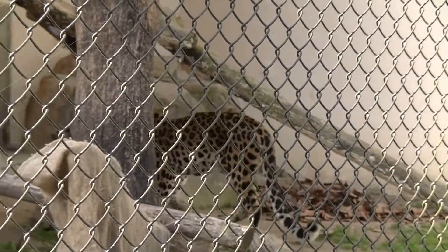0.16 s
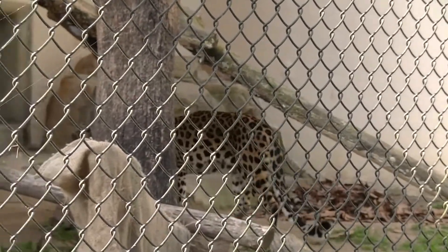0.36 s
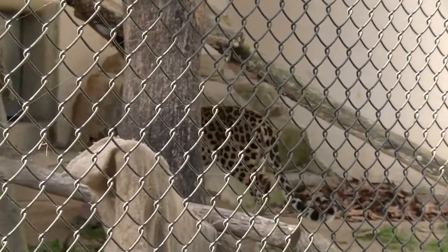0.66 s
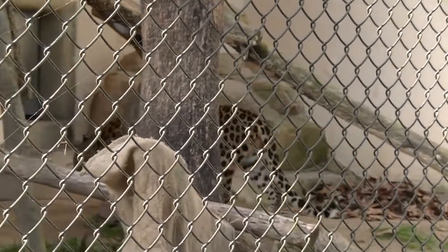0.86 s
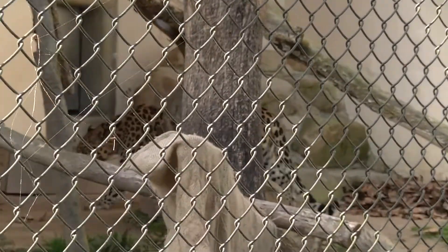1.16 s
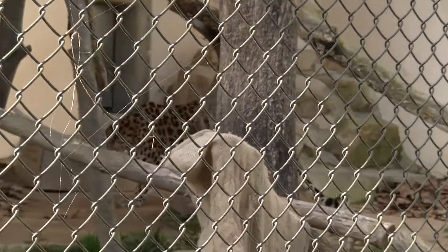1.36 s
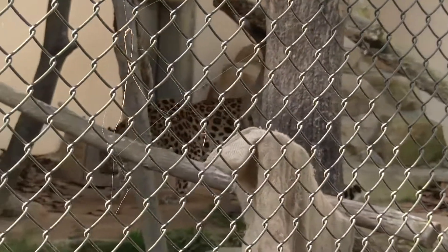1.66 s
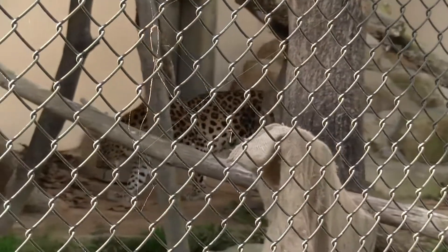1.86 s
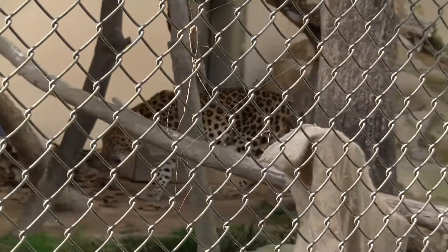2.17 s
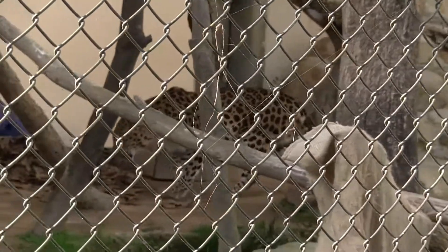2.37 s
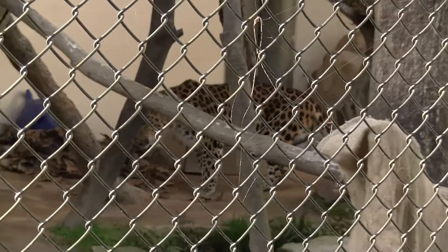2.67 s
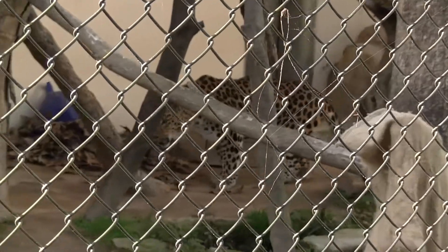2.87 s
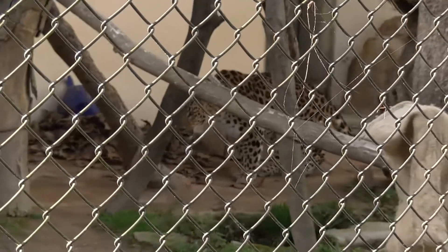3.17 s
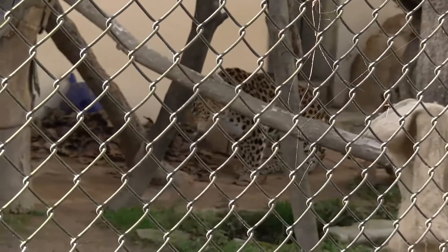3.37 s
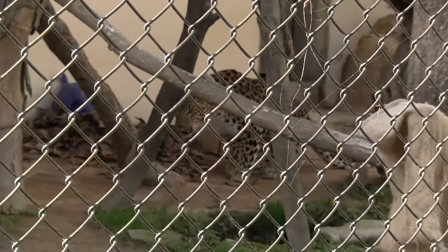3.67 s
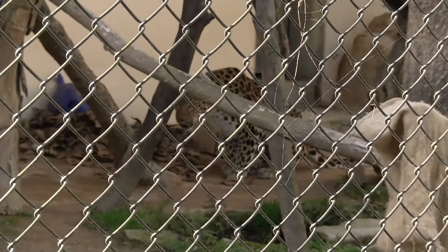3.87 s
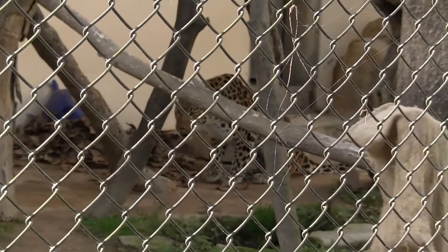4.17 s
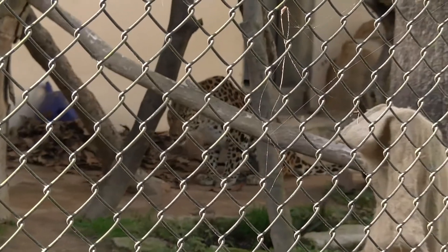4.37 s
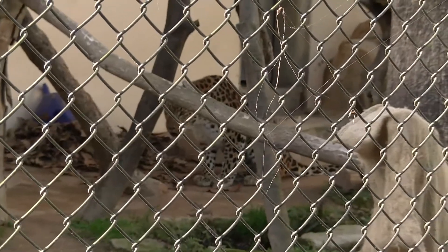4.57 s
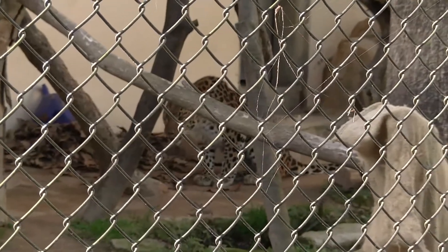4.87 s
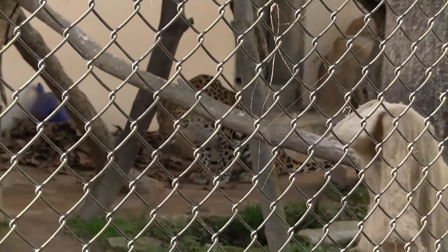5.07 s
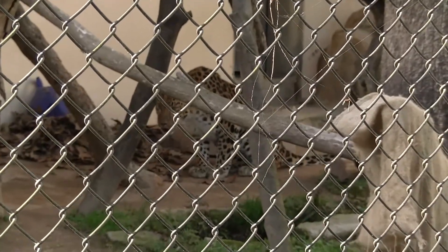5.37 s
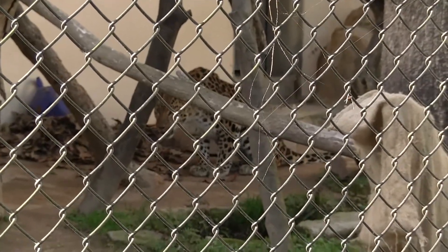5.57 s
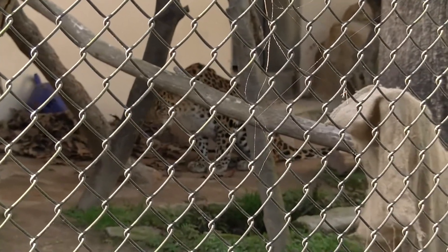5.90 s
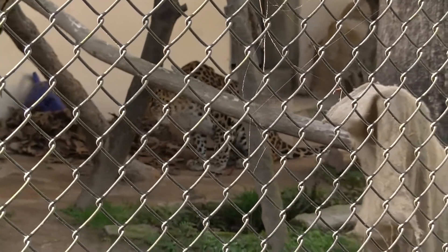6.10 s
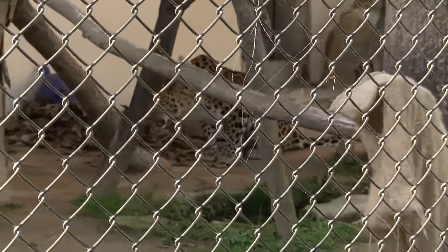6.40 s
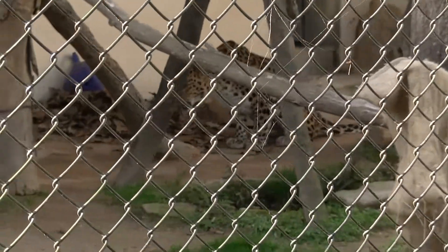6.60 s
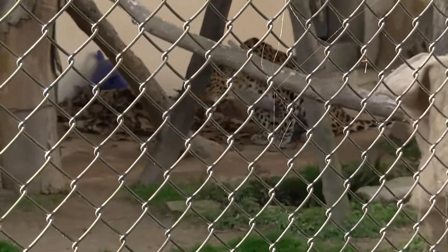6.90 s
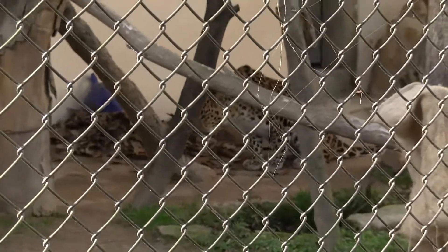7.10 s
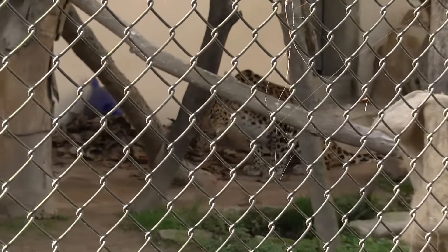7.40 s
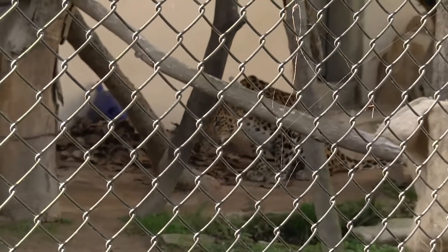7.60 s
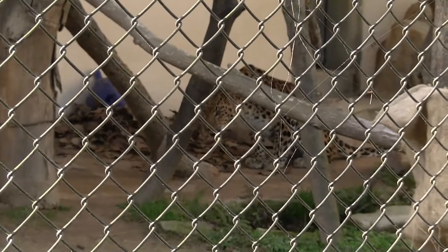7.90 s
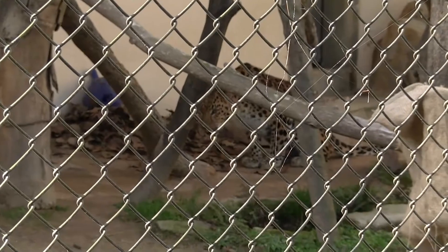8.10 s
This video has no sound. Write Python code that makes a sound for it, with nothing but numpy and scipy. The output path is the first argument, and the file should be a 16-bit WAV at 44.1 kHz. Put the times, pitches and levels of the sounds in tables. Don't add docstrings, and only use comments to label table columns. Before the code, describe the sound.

Deep, rough sawing calls from a leopard-like cat, a softer rasp in and a harder grunt out, repeating steadily over a distant low hum.

```python
import sys
import numpy as np
from scipy import signal
from scipy.fft import rfft, irfft, next_fast_len
from scipy.io import wavfile
from scipy.ndimage import uniform_filter1d

SR = 44100
rng = np.random.default_rng(int(sys.argv[2]) if len(sys.argv) > 2 else 0)


def linear_from_db(decibels):
    return 10 ** (np.asarray(decibels, float) / 20)


def persist_wave(psi):
    counts = np.round(np.clip(psi, -1, 1) * 32767).astype(np.int16)
    wavfile.write(sys.argv[1], SR, np.atleast_2d(counts).T)


N = 363825


def evened(x):
    return x / np.sqrt(np.mean(x ** 2) + 1e-20)


def read(points, hz):
    f, value = np.transpose(points)
    return np.interp(np.log(hz + 1), np.log(f + 1), value)


def add(mix, start_s, sound):
    part = mix[round(start_s * SR):][:len(sound)]
    part += sound[:len(part)]


def coloured(x, points, scale=1):
    size = next_fast_len(x.shape[-1] + 2048)
    hz = np.fft.rfftfreq(size, 1 / SR)
    return irfft(rfft(x, size) * linear_from_db(scale * read(points, hz)), size)[..., :x.shape[-1]]


def wander(count, per_s):
    knots = rng.standard_normal(int(count / SR * per_s) + 3)
    return np.interp(np.arange(count) / SR * per_s, np.arange(len(knots)), knots)


# f/Hz, level/dB per Hz
AIR_TONE = [(20, -40), (50, -6), (125, -6.5), (250, -12), (340, -19.5), (800, -22), (4000, -38),
            (15500, -50.5)]
# f/Hz, likeness/0-1
AIR_LIKENESS = [(60, 1), (240, 0.24), (950, 0.043), (3770, 0.03), (15000, 0.085)]


def air():
    frames, hz = N // 512 + 5, np.fft.rfftfreq(2048, 1 / SR)
    a, b, c, d, patches = rng.standard_normal((frames, 1025, 5)).T
    patches = uniform_filter1d(patches, size=16, axis=0)
    patches = evened(uniform_filter1d(patches, size=8, axis=1))
    same = np.clip(read(AIR_LIKENESS, hz), -1, 1)[:, None]
    left = a + 1j * b
    right = same * left + np.sqrt(1 - same ** 2) * (c + 1j * d)
    z = np.array([left, right]) * linear_from_db(read(AIR_TONE, hz)[:, None] + 1.5 * patches)
    wash = signal.istft(z, nperseg=2048, noverlap=1536)[1][:, :N]
    return linear_from_db(-43) * evened(wash)


# f/Hz, level/dB rms
MACHINE_LINES = [(59.5, -41.5), (122, -49)]


def hum():
    total = np.zeros(N)
    for hz, db in MACHINE_LINES:
        level = linear_from_db(db + 2.5 * wander(N, 6.))
        turns = np.cumsum(hz * (1 + .018 * wander(N, 8.))) / SR
        total += level * np.sin(2 * np.pi * turns)
    return np.sqrt(2) * total


def course(t, length, effort_db, top_hz, open_db, layers, swell, swell_db, fade, fade_db, sag_db,
           bend, slack, sink, gape_at=0, rest_hz=0, gape_hz=0):
    u = t / length
    rising = swell_db * np.clip(1 - u / swell, 0, 1) ** 1.27
    falling = sag_db * u + fade_db * np.clip(1 - (1 - u) / fade, 0, 1) ** bend
    slackening = np.clip(slack, 0, 6e-3) * (rising + np.maximum(falling, -20))
    low_hz = top_hz * (1 + slackening - sink * (u - .3))
    tension = 10 * (top_hz / 210 - 1)
    higher = [db + by_open * open_db + by_swell * rising + by_fade * falling + by_tension * tension
              for db, by_open, by_swell, by_fade, by_tension in layers]
    jaw = []
    if gape_hz:
        gape = np.exp(-((u - gape_at) / np.where(u < gape_at, .14, .22)) ** 2)
        jaw = [rest_hz + (gape_hz - rest_hz) * gape]
    return effort_db + rising + falling, low_hz, *higher, *jaw


def slapping_folds(count, slaps_per_s, jitter, spread_db, gate):
    turns = np.cumsum(slaps_per_s * np.exp(jitter * wander(count, 40.))) / SR + rng.random()
    cycle = turns.astype(int)
    size = linear_from_db(spread_db * np.clip(rng.standard_normal(cycle[-1] + 1), -2, 1.6))[cycle]
    slaps = evened(np.diff(cycle, prepend=cycle[0]) * size)
    burst = evened(gate + size * np.exp(-(turns % 1) / 0.31))
    return signal.lfilter(*signal.butter(2, 1000.0 / (SR / 2)), slaps), burst


# t/s, peak level/dB
FOLD_CATCHES = [(1.295, -30), (1.497, -15), (2.051, -28), (2.181, -21.5), (2.673, -12), (2.82, -16),
                (2.881, -8), (3.296, -15), (3.462, -15), (3.9, -24), (3.99, -14), (4.135, -18),
                (4.245, -10), (4.306, 7), (4.568, -23), (4.83, -19), (4.906, -7), (4.95, -9), (5.26, -24),
                (5.521, -29), (5.637, -7), (5.98, -26), (6.028, -15), (6.236, -21), (6.677, -25),
                (6.75, -16), (6.93, -17), (6.983, -8), (7.65, -25)]


def catches(t, start_s, effort_db, mouth_db):
    caught = np.zeros(len(t))
    for at, db in FOLD_CATCHES:
        strength = linear_from_db(np.clip(db + 11.0 - effort_db - mouth_db, -20, 8)) * (t >= at) * (at >= start_s)
        caught += strength * np.exp(-abs(t - at) / 0.018)
    return caught


def resonate(x, hz, width):
    turn = np.exp(2j * np.pi * np.cumsum(hz * np.ones(len(x))) / SR)
    r = np.exp(-np.pi * width / SR)
    return 2 * (turn * signal.lfilter([1 - r], [1, -r], x / turn + 1e-18)).real


def steadied(x, firmness):
    swing = np.sqrt(uniform_filter1d(x ** 2, size=1500) + 0.0071 * np.mean(x ** 2))
    return evened(x / swing ** np.clip(firmness, 0, 1))


def low_throat(drive, throb, swing_turns, low_hz, sung, chest, cut_hz):
    rung = drive
    for width in (84.0, 83.0, 102.0):
        rung = resonate(rung, low_hz, width)
    swing = evened(throb * np.cos(2 * np.pi * swing_turns))
    low = np.sqrt(1 - sung) * evened(rung) + np.sqrt(sung) * swing
    for hz, width, db in chest:
        low += linear_from_db(db) * evened(resonate(resonate(drive, hz, width), hz, 2 * width))
    band = signal.butter(4, [cut_hz / (SR / 2), 281.4 / (SR / 2)], "band", output="sos")
    return signal.sosfilt(band, low)


def throat(drive, modes, stretch):
    out = 0
    for k, (hz, width, db) in enumerate(modes):
        moved_hz = hz * (stretch if k == 1 else stretch ** 0.083 + 0.03 * wander(len(drive), 10.1))
        ring = resonate(resonate(drive, moved_hz, 0.83 * width), moved_hz, 2.6 * width)
        out = out + (-1) ** k * linear_from_db(db) * ring
    return evened(out)


def teeth_jet(puffs, hiss, push_db):
    count = len(puffs)
    teeth_hz = 6800 + 500 * wander(count, 5.2)
    whistles = sum(linear_from_db(8 * wander(count, 30.)) * resonate(puffs, k * teeth_hz, 700.0) for k in (1, 1.4))
    jet = steadied(coloured(puffs + 0.96 * whistles, hiss), 1.0)
    dull = signal.lfilter(*signal.butter(2, 9500.0 / (SR / 2)), jet)
    bright = np.clip((push_db + 62.0) / 23.0, 0, 1)
    return dull + bright * (jet - dull)


def breath(row, shape, layers, sung, chest, mouth, upper, hiss,
           slaps_per_s, jitter, spread_db, rough, gate, rise_s, cut_hz):
    start_s, end_s = row[0], row[0] + row[1]
    t = np.arange(start_s, end_s, 1 / SR)
    count = len(t)
    effort_db, low_hz, mouth_db, upper_db, hiss_db, *mouth_hz = course(t - start_s, *row[1:], layers, **shape)
    slaps, burst = slapping_folds(count, slaps_per_s, jitter, spread_db, gate)
    caught = catches(t, start_s, effort_db, mouth_db)
    noise = rng.standard_normal((2, count))
    flow = burst + caught
    throat_puffs = uniform_filter1d(flow, size=40) * noise[0]
    teeth_puffs = (0.093 + uniform_filter1d(flow, size=160)) * noise[1]
    low_drive = (1 - rough) * slaps + rough * burst * noise[0]
    high_drive = 0.62 * (1 - rough) * slaps + throat_puffs
    swing_turns = np.cumsum(low_hz * (1 + 0.0539 * wander(count, 46.53))) / SR
    throb = uniform_filter1d(burst, size=150)
    low = low_throat(low_drive, throb, swing_turns, low_hz, sung, chest, cut_hz)
    overtones = throb * sum(np.cos(2 * np.pi * k * swing_turns) for k in range(2, 6))
    stretch = mouth_hz[0] / mouth[1][0] if mouth_hz else low_hz / low_hz.mean()
    stretch = stretch + 0.014 * wander(count, 12.9)
    mouth_drive = .5 * (low_drive + high_drive) + 0.034 * sung * overtones
    upper_stretch = 1 + 0.051 * wander(count, 8.8)
    voice = steadied(low, 0.91)
    voice += linear_from_db(mouth_db) * steadied(throat(mouth_drive, mouth, stretch), 0.83)
    voice += linear_from_db(upper_db) * steadied(throat(high_drive, upper, upper_stretch), 1.0)
    voice += linear_from_db(hiss_db) * teeth_jet(teeth_puffs, hiss, effort_db + hiss_db)
    edges = np.clip(np.minimum((t - start_s) / rise_s, (end_s - t) / 0.028), 0, 1)
    punch = 1 + .18 * uniform_filter1d(caught, size=90) + .15 * uniform_filter1d(burst, size=120) ** 2
    return start_s, linear_from_db(effort_db - 1.5) * voice * edges * punch


# t/s, effort level/dB, lowest throat f/Hz, mouth opening level/dB, swell depth/dB
IN_BREATHS = [(0.0, -44, 170, -15, 8.5), (1.285, -38, 187, -8, 5), (1.98, -19.5, 198.4, -6, -9.5),
              (2.61, -17, 192.8, 0, -13), (3.23, -17.5, 202.8, 2, -16.5), (3.88, -17, 195.5, 0, -12.5),
              (4.55, -14.5, 198.6, 0.5, -11.5), (5.24, -14, 194.9, -0.5, -14),
              (5.94, -14.5, 197.5, -1, -13.5), (6.64, -14.5, 181, -0.5, -13), (7.35, -14.5, 190.2, 0, -13),
              (8.09, -15.5, 200, 1, -15.5)]
IN_STEADY = [.1, .2, .75, .45, .4, .4, .45, .35, .45, .45, .35, .4]
IN_SHAPE = dict(swell=0.5, fade=0.32, fade_db=-12, sag_db=-1, bend=1.46, slack=0.0018, sink=0.046)
# level/dB over effort, dB per dB of opening, swell, fade, dB per tenth of tension
IN_FOLLOW = [(-5.5, .99, 0.11, 0.36, 0.22), (-18, 0.63, -0.074, 0.62, .1), (-28.5, 0.54, -0.22, 0.54, .1)]
# f/Hz, width/Hz, level/dB
IN_CAVITIES = [(64, 8, -14), (128, 14, -6), (165, 24, -4)]
# f/Hz, width/Hz, level/dB
IN_MOUTH_RINGS = [(379, 84, 6), (576, 98, -5.5), (635, 71, 1), (760.6, 77, 1)]
# f/Hz, width/Hz, level/dB
IN_UPPER_RINGS = [(1196, 156, 6), (1786, 170, 2.5), (2190, 470, -6), (3066, 220, -8), (3630, 400, -13.5)]
# f/Hz, level/dB per Hz
IN_HISS_TONE = [(2530, -42), (4300, -4.5), (5510, -5), (6570, -4), (7200, -5.5), (9070, -7.5), (13200, -8),
                (15500, -29)]


def breaths_in():
    mix = np.zeros(N)
    turns_out = [row[0] for row in [*GRUNTS, *OUT_BREATHS]]
    for (start, *row, swell_db), sung in zip(IN_BREATHS, IN_STEADY):
        length = min([.31] + [turn - start for turn in turns_out if turn > start])
        shape = dict(IN_SHAPE, swell_db=swell_db)
        add(mix, *breath([start, length, *row], shape, IN_FOLLOW, sung, IN_CAVITIES, IN_MOUTH_RINGS,
                         IN_UPPER_RINGS, IN_HISS_TONE, slaps_per_s=42., jitter=0.24, spread_db=2.5,
                         rough=0.48, gate=0.67, rise_s=0.012, cut_hz=47.0))
    return mix


# t/s, length/s, effort level/dB, lowest throat f/Hz, mouth f/Hz
GRUNTS = [
    (0.583, 0.34, -16, 186, 506),
    (1.4, .45, -13, 189.5, 539),
]
OUT_STEADY = [.45, .55, .8, .55, .5, .5, .5, .35, .45, .55, .5]
GRUNT_SHAPE = dict(swell=.24, swell_db=-13.5, fade=0.55, fade_db=-25.5, sag_db=-5.5, bend=1.48, slack=.0011, sink=0.079, gape_at=0.37)
GRUNT_FOLLOW = [(-16, 0, -0.26, -0.06, 0), (-25, 0, -0.095, -0.24, 0), (-34.5, 0, -.3, .11, 0)]
# f/Hz, width/Hz, level/dB
GRUNT_CAVITIES = [(116.6, 15.6, -5.5), (157.2, 7.3, -4.5)]
# f/Hz, width/Hz, level/dB
GRUNT_MOUTH_RINGS = [(383, 57, -7.5), (524, 70, 2.5), (761, 99, -2.5), (907, 68, -6.5)]
# f/Hz, width/Hz, level/dB
GRUNT_UPPER_RINGS = [(1317, 220, 0.5), (1970, 180, -4.5), (2420, 160, -4.5), (2780, 100, -1.5),
                     (3140, 100, -5), (3760, 490, -10)]
# f/Hz, level/dB per Hz
OUT_HISS_TONE = [(2530, -18), (4300, -14), (4740, -3), (5360, -1.5), (8600, -1), (10200, -5.5),
                 (12400, -2.5), (15500, -18)]


def opening_grunts():
    mix = np.zeros(N)
    for (*row, jaw_hz), sung in zip(GRUNTS, OUT_STEADY):
        shape = dict(GRUNT_SHAPE, rest_hz=0.954 * jaw_hz, gape_hz=jaw_hz)
        add(mix, *breath([*row, 0], shape, GRUNT_FOLLOW, sung, GRUNT_CAVITIES, GRUNT_MOUTH_RINGS,
                         GRUNT_UPPER_RINGS, OUT_HISS_TONE, slaps_per_s=45., jitter=.15, spread_db=1.5,
                         rough=0.37, gate=1.0, rise_s=0.019, cut_hz=87.0))
    return mix


# t/s, effort level/dB, lowest throat f/Hz, mouth opening level/dB, mouth f/Hz at widest gape
OUT_BREATHS = [
    (2.17, -10.5, 204.5, -6, 612),
    (2.81, -11.5, 226.2, -1, 626),
    (3.46, -10, 241.9, -0.5, 646),
    (4.13, -11, 244.8, 0, 654),
    (4.829, -9.5, 236.7, -2, 640),
    (5.519, -10, 234, -0.5, 615),
    (6.229, -12, 211.5, 0, 600),
    (6.929, -11.5, 206.5, -0.5, 590),
    (7.649, -11.5, 212, 1, 572),
]
OUT_SHAPE = dict(swell=0.11, swell_db=-16.5, fade=.5, fade_db=-30, sag_db=-5, bend=1.2, slack=0.001, sink=0.081, gape_at=.22, rest_hz=548)
OUT_FOLLOW = [(-6.5, 1.1, -0.25, 0.13, -0.22), (-16.5, 1.15, -0.36, -0.001, -0.55),
              (-26, 1.02, -0.27, 0.44, 0)]
# f/Hz, width/Hz, level/dB
OUT_CAVITIES = [(120.4, 23, -14), (162.2, 33, -6.5), (274, 43, -4)]
# f/Hz, width/Hz, level/dB
OUT_MOUTH_RINGS = [(367, 540, -22.5), (586, 79, 2.5), (810, 79, -9.5), (981, 110, -12.5)]
# f/Hz, width/Hz, level/dB
OUT_UPPER_RINGS = [(1301, 110, 1.5), (1485.5, 91, -4.5), (1843, 198, -4), (2397, 203, -10.5),
                   (2750, 284, -11.5), (3220, 155, -11.5), (3680, 463, -14.5)]


def breaths_out():
    mix = np.zeros(N)
    for (start, effort_db, low_hz, open_db, jaw_hz), sung in zip(OUT_BREATHS, OUT_STEADY[2:]):
        row = [start, .43 + .006 * open_db, effort_db, low_hz, open_db]
        shape = dict(OUT_SHAPE, gape_hz=jaw_hz)
        add(mix, *breath(row, shape, OUT_FOLLOW, sung, OUT_CAVITIES, OUT_MOUTH_RINGS,
                         OUT_UPPER_RINGS, OUT_HISS_TONE, slaps_per_s=54., jitter=.2, spread_db=3.0,
                         rough=0.34, gate=0.37, rise_s=0.0075, cut_hz=106.4))
    return mix


def cat():
    voice = breaths_in() + opening_grunts() + breaths_out()
    return signal.lfilter(*signal.butter(2, 48. / (SR / 2), "high"), voice)


# f/Hz, t60/s
WALL_DECAY = [(100, 0.89), (200, 0.18), (280, 1), (400, 0.26), (1000, 0.5), (4000, 0.33), (12000, 0.2)]
# f/Hz, level/dB
WALL_LEVEL = [(100, 3), (200, -4.5), (280, -11), (500, -1), (2000, 2.5), (5000, 3.5), (12000, 1.5)]
# f/Hz, likeness/0-1
WALL_LIKENESS = [(100, 0.99), (500, 0.99), (1000, 0.75), (3000, 0.24), (12000, 0.033)]


def walls(x):
    taps = np.zeros((3, SR))
    at = np.arange(200, SR - 20, 20) + rng.integers(0, 20, (3, (SR - 201) // 20))
    np.put_along_axis(taps, at, rng.choice([-1., 1.], at.shape), 1)
    hz, t, z = signal.stft(taps, SR, nperseg=512)
    t60 = read(WALL_DECAY, hz)[:, None]
    same = np.clip(read(WALL_LIKENESS, hz), 0, 1)[:, None]
    z = np.sqrt(same) * z[2] + np.sqrt(1 - same) * z[:2]
    unit = np.sqrt(6 * np.log(10) * 20 / SR / t60)
    z *= linear_from_db(read(WALL_LEVEL, hz)[:, None] - 60 * t / t60) * unit
    echo = signal.istft(z, SR, nperseg=512)[1]
    return signal.fftconvolve(x[None], echo, axes=1)[:, :N]


def scene():
    voice = cat()
    return air() + hum() + linear_from_db(-3.5) * (voice + walls(voice))


# f/Hz, level/dB
LEFT_OVER_RIGHT = [(60, 8.5), (180, 7), (550, 6.5), (1650, 4.5), (4970, 4.5), (15000, -0.5)]


def microphone_pair(dry):
    left = coloured(dry[0], LEFT_OVER_RIGHT, .5)
    right = coloured(dry[1], LEFT_OVER_RIGHT, -.5)
    return np.array([left, right])


def low_pass(x):
    return signal.sosfilt(signal.butter(12, 15680, fs=SR, output="sos"), x)


def record(dry):
    mix = np.clip(microphone_pair(dry), -1, 1)
    return low_pass(mix)


dry = scene()
out = record(dry)
persist_wave(out)
```